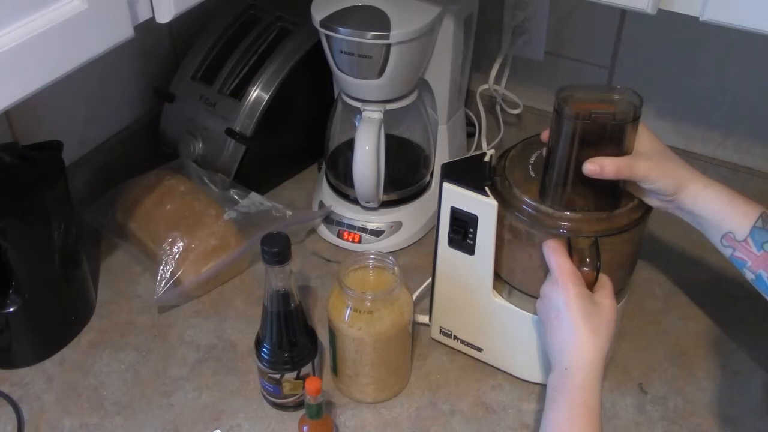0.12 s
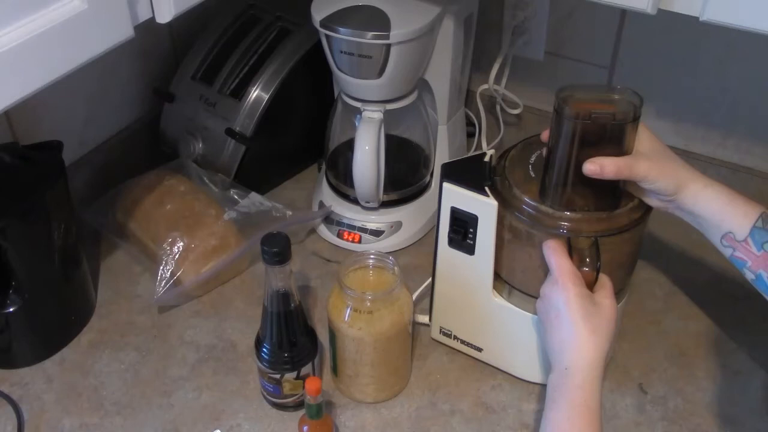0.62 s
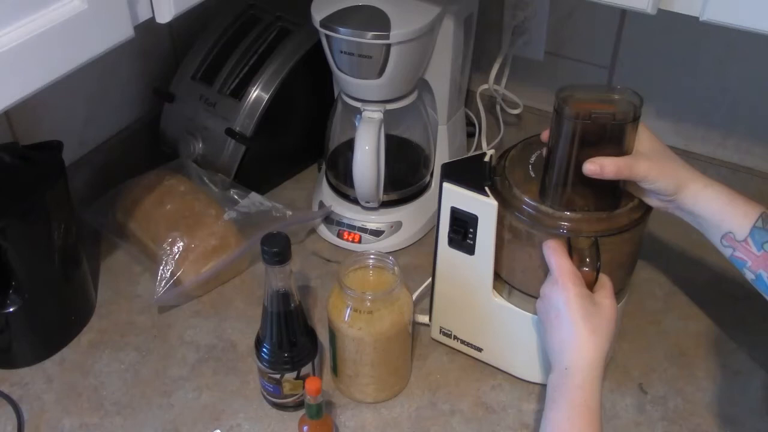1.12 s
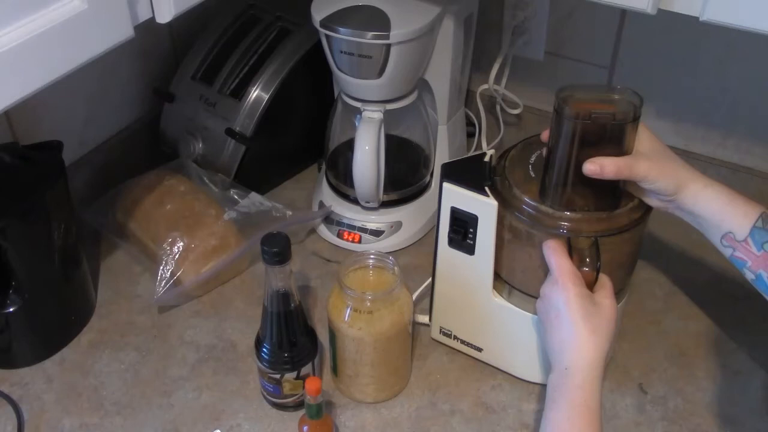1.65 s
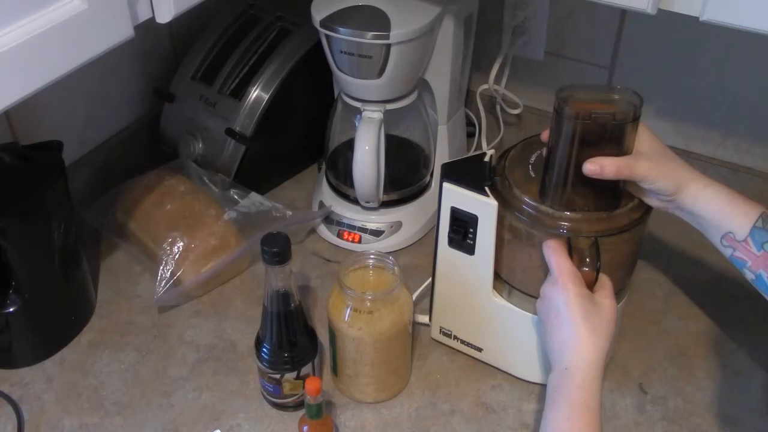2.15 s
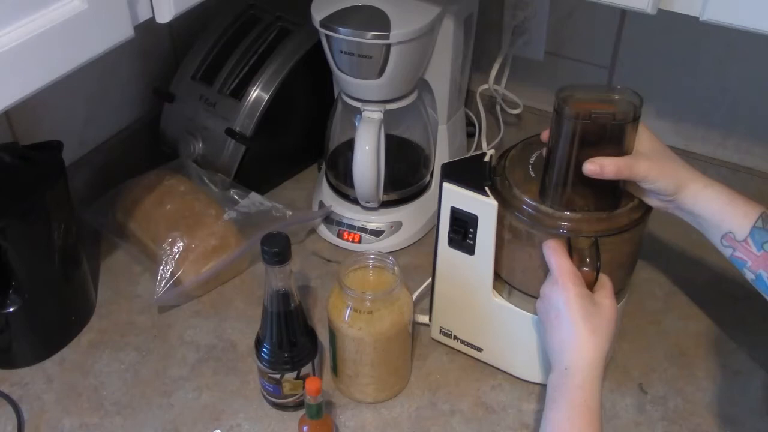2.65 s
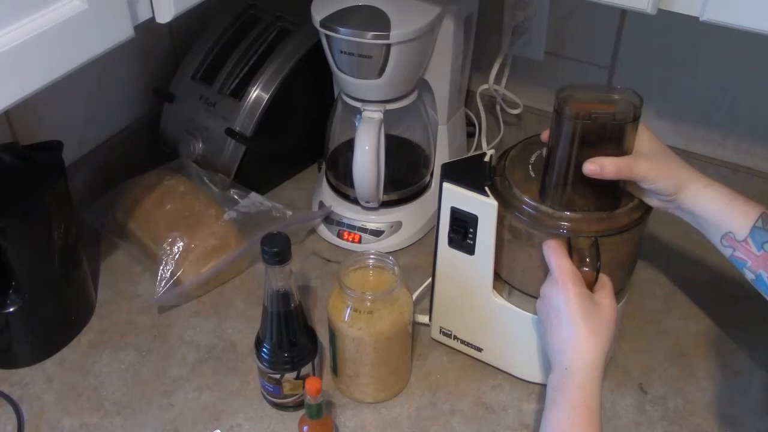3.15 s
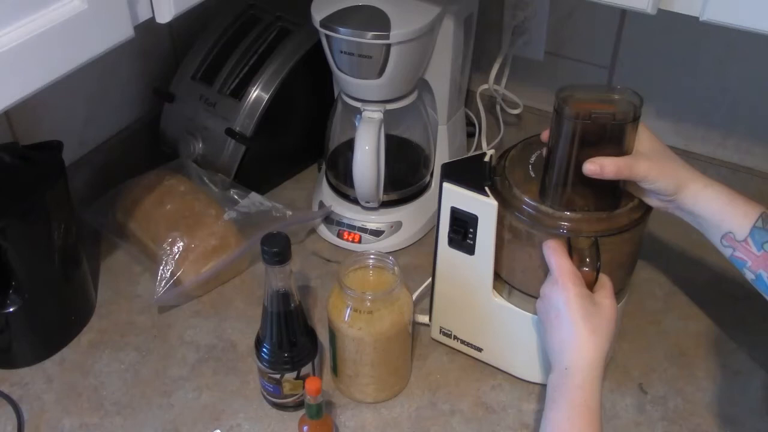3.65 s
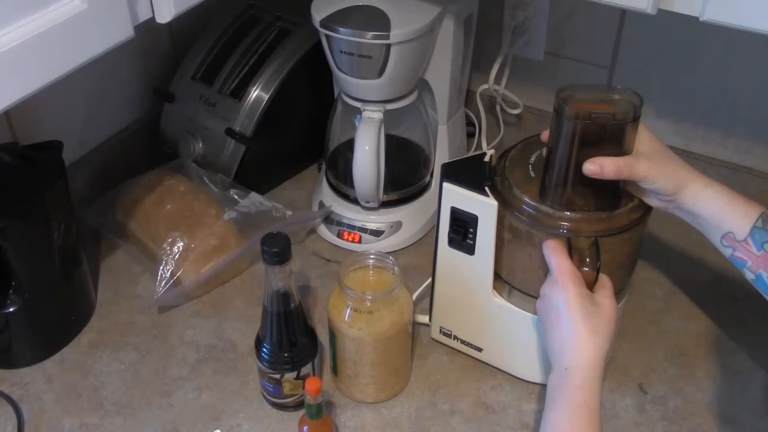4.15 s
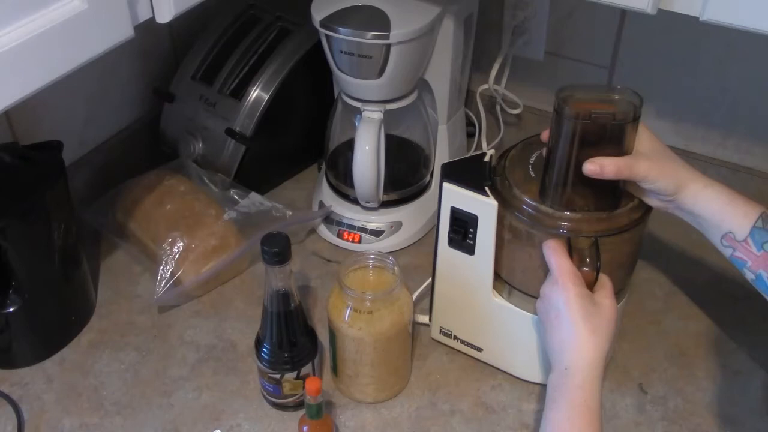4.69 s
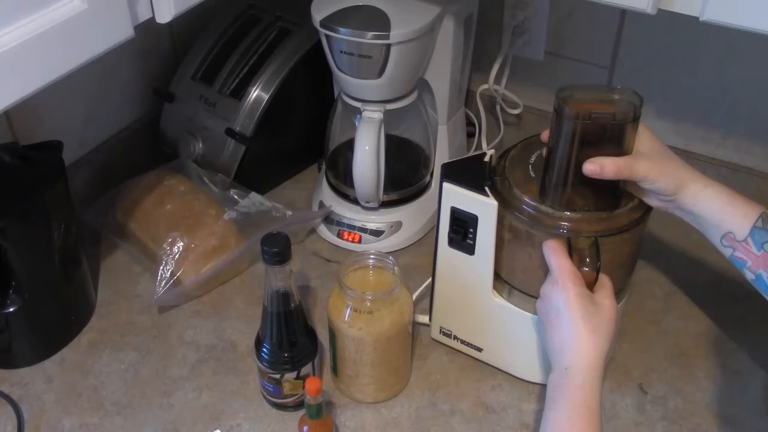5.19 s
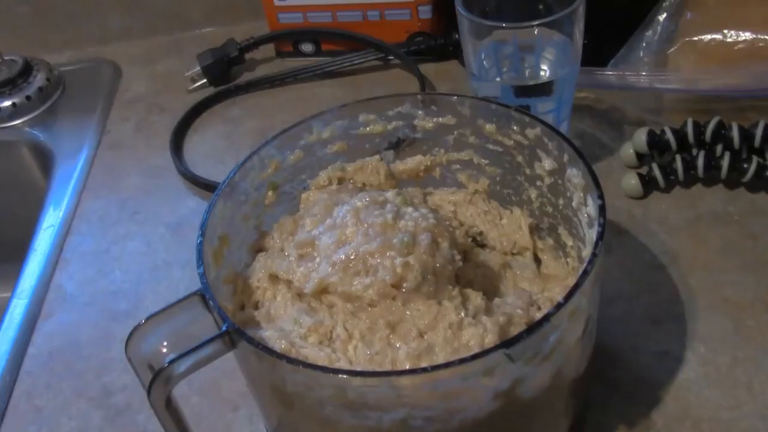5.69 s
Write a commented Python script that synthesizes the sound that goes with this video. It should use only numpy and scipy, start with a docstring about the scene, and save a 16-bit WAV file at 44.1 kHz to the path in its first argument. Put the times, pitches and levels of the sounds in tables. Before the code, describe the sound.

Quiet kitchen room tone with a faint low hum opens the scene. At 0.7 s a bowl is set down with a hard woody knock and several fast rattles until 0.83 s. A brief dip to silence at 0.88 s leads to hurried, sped-up handling: grainy lid friction and bright plastic clicks, strongest around 1.2-1.3 and 1.5 s. A switch snaps at 1.67 s and the food processor starts almost instantly, a loud, dense, gritty roar centred around 2.5-4 kHz, with thin whines and slight flutter, little bass. At 4.0-4.14 s plastic clacks, a bright ringing metal clank and a tiny rising squeak interrupt; the motor drops about 8 dB and creeps back over a second. At 5.5 s a click ends it, with a short reverberant ring-out. After another dip at 5.68 s, quiet room tone fades in with a very faint knock and squeak. Close, dry, identical channels.

```python
"""A food processor on a kitchen counter: dense noise rings through housing and bowl, with thin motor whines.
Before it, the bowl is set down with knocks in a quiet room; a fade leads into a stretch heard four times fast.
There the lid is twisted shut (friction noise, ringing plastic modes), the switch snaps and the motor grinds.
Metal clanks beside it, the level ducks and creeps back; it stops, rings out, and the quiet room fades in."""
import sys
import numpy as np
from scipy import signal
from scipy.fft import rfft, irfft
from scipy.io import wavfile
from scipy.ndimage import uniform_filter1d, minimum_filter1d

SR = 44100
rng = np.random.default_rng(int(sys.argv[2]) if len(sys.argv) > 2 else 0)


def volts_from_db(level):
    """Convert decibel levels to linear amplitude ratios."""
    exponent = np.asarray(level, float) / 20
    return 10 ** exponent


def master_out(mix):
    """Clip the mix to full scale and print it as 16-bit PCM to the path in sys.argv[1]."""
    frames = np.transpose(np.atleast_2d(mix))
    ceiling = np.clip(frames, -1, 1)
    pcm = np.round(ceiling * 32767).astype(np.int16)
    wavfile.write(sys.argv[1], SR, pcm)


N = 256132
T = np.arange(N) / SR
HZ = np.maximum(np.arange(N // 2 + 1) * SR / N, 1)
START_S, STOP_S = 1.6684, 5.497   # motor on, off


def rms_one(x):
    """Scale to unit rms."""
    return x / np.sqrt(np.mean(x ** 2) + 1e-20)


def in_time(rows):
    """Columns of a table joined by straight lines over time."""
    s, *columns = np.transpose(rows)
    return [np.interp(T, s, column) for column in columns]


def at_hz(points, hz):
    """A spectrum in dB read on a log frequency axis."""
    points_hz, values = np.array(points).T
    return np.interp(np.log(hz), np.log(points_hz), values)


def resonances(peaks):
    """Power of noise-driven resonances with steep skirts, at every frequency."""
    power = 0
    for hz, width_hz, db in peaks:
        offset = 2 * (HZ - hz) / width_hz
        power = power + volts_from_db(2 * db) / (1 + 0.495 * offset ** 2) ** 2
    return power


def coloured(gain):
    """Unit-rms noise with the given gain shape over frequency."""
    return rms_one(irfft(rfft(rng.standard_normal(N)) * gain, N))


def drift(rate_hz):
    """Random wander of unit rms: two-pole low-passed noise, computed every 40 samples."""
    r = np.exp(-80 * np.pi * rate_hz / SR)
    slow = signal.lfilter([1], [1, -2 * r, r * r], rng.standard_normal(N // 40 + 2002))
    slow = rms_one(slow[2000:])   # settled part
    return np.interp(np.arange(N) / 40, np.arange(len(slow)), slow)


def strike(start_s, level_db, modes, rise_ms, spread_db, detune, crack_db, crack_s):
    """A blow: modes of random strength and pitch die away over a short noise crack; level_db maps Hz to dB."""
    t = np.arange(SR // 4) / SR
    luck = rng.standard_normal((len(modes), 2))
    blow = 0
    for (hz, db, t60_s), (strength, pitch) in zip(modes, luck):
        decay = volts_from_db(-60 * t / t60_s)
        tone = np.sin(2 * np.pi * hz * (1 + detune * pitch) * t)
        blow = blow + volts_from_db(db + level_db(hz) + spread_db * strength) * decay * tone
    hz = np.maximum(np.arange(len(t) // 2 + 1) * SR / len(t), 1)
    crack = irfft(rfft(rng.standard_normal(len(t))) * volts_from_db(level_db(hz)), len(t))
    blow = blow + volts_from_db(crack_db) * crack * np.exp(-t / crack_s)
    blow = blow * np.minimum(1000 * t / max(rise_ms, .05), 1)
    out, at = np.zeros(N), round(start_s * SR)
    out[at:at + len(t)] = blow[:N - at]
    return out


def room(x, t60_s, wet_db, dull_hz):
    """Direct sound plus a tail of dying noise, low-passed at dull_hz."""
    t = np.arange(round(SR * .6)) / SR
    low_pass = signal.butter(1, dull_hz, fs=SR, output="sos")
    tail = signal.sosfilt(low_pass, rng.standard_normal(len(t))) * volts_from_db(-60 * t / t60_s)
    tail = tail / np.sqrt(np.sum(tail ** 2))
    return x + volts_from_db(wet_db) * signal.fftconvolve(x, tail)[:N]


def hum(lines, waver_db):
    """Steady tones whose levels waver at random."""
    out = 0
    for hz, db in lines:
        out = out + np.sqrt(2) * volts_from_db(db + waver_db * drift(6)) * np.sin(2 * np.pi * hz * T)
    return out


# quiet room noise shape: f/Hz, density/dB relative
QUIET_COLOUR = [(40, -51), (170, -11), (300, -11), (520, -10.5), (800, -14), (1100, -17.5), (3000, -25.5),
                (9000, -37.5), (9900, -33), (10800, -43), (15500, -49)]
# quiet room tones: f/Hz, level/dB rms
QUIET_TONES = [(242.2, -56.5), (301.5, -53.5), (360.7, -65.5), (414.5, -59), (522.2, -62.5)]


def quiet_room():
    """Room noise of slowly wandering level, with low hum tones."""
    noise_db = -46.5 + 1.0 * drift(4.9)
    return volts_from_db(noise_db) * coloured(volts_from_db(at_hz(QUIET_COLOUR, HZ))) + hum(QUIET_TONES, waver_db=1.0)


# knocks of the bowl: t/s, level/dB, brightness/dB, rise/ms
BOWL_KNOCKS = [(0.6916, -5, -4.5, 2.96), (.712, -17.5, 2, 1.6), (.727, -18.5, -7.5, 1.53),
               (.757, -13, 9, 0.71), (.765, -17.5, -5, 1.42), (.829, -27.5, -11.5, 1.24),
               (5.775, -33.5, -8, 8.4)]
# modes of the knock: f/Hz, level/dB relative, t60/s
WOODEN_MODES = [(110, -8, .06), (430, -6, .035), (600, -8, .03), (800, -8, .03), (1000, -8, .03),
                (1180, -6, .03), (1360, -6, .03), (1790, 3, .018), (1930, 2, .016), (2440, -3, .025),
                (2650, -5, .022), (3540, -10, .018), (4200, -12, .015)]


def knocks():
    """The bowl is set down and rattles once more: wooden modes ring under a noise crack."""
    out = 0
    for s, db, bright_db, rise_ms in BOWL_KNOCKS:
        tone = [(60, -36), (250, -10.5), (2000, -6.5),
                (5000, bright_db - 18), (9000, bright_db - 38), (15000, bright_db - 50)]
        out = out + strike(s, lambda hz: db + at_hz(tone, hz), WOODEN_MODES, rise_ms,
                           spread_db=2.0, detune=0.02, crack_db=5.0, crack_s=0.0049)
    return room(out, t60_s=0.404, wet_db=-6, dull_hz=6000)


# room noise shape, four times fast: f/Hz, density/dB relative
QUICK_COLOUR = [(60, -37.5), (400, -22), (650, -20.5), (1000, -5.5), (1500, -7), (3000, -11.5), (6000, -18),
                (15700, -26)]
# room tones, four times fast: f/Hz, level/dB rms until the stop
QUICK_TONES = [(721, -60.5), (1203, -55.5)]


def quick_room():
    """Room noise and hum tones as heard four times fast; 3 dB lower after the stop."""
    noise = volts_from_db(-45) * coloured(volts_from_db(at_hz(QUICK_COLOUR, HZ)))
    return (noise + hum(QUICK_TONES, waver_db=2.5)) * volts_from_db(-3 * (T > STOP_S))


# lid strokes along the rim: peak t/s, level/dB, rim ring level/dB relative, 20 dB swell/s, 20 dB sink/s
LID_STROKES = [(.95, -46, -14.5, 3.25, 0.25), (1.15, -40, 5.5, 0.18, 0.23),
               (1.235, -38.5, -5.5, 0.24, 0.24), (1.35, -42.5, -1.5, 0.02, 0.17)]
# friction noise shape: f/Hz, density/dB relative
RUB_COLOUR = [(400, -20.5), (900, -12), (1500, -2.5), (4000, -8), (9000, -6.5), (15700, -17.5)]
# rim resonances: f/Hz, width/Hz, level/dB relative
RIM_PEAKS = [(4060, 300, 2.5), (8000, 400, -3.5), (13370, 740, 1.5), (14380, 1200, -4.5)]


def slide():
    """Grainy friction noise under each lid stroke, with noise at the rim's resonances."""
    ring_steepness = 1.6   # the ring swells and sinks faster than the rub
    rub_rows, rim_rows = [], []
    for s, db, ring_db, swell_s, sink_s in LID_STROKES:
        under_db = -20 * np.maximum((s - T) / swell_s, (T - s) / sink_s)
        rub_rows.append(db + under_db)
        rim_rows.append(db + ring_db + ring_steepness * under_db)
    rub_db, rim_db = np.max(rub_rows, axis=0), np.max(rim_rows, axis=0)
    rub = coloured(volts_from_db(at_hz(RUB_COLOUR, HZ))) * volts_from_db(rub_db + 2.3 * drift(40))
    rim = coloured(np.sqrt(resonances(RIM_PEAKS))) * volts_from_db(rim_db + 2.0 * drift(25))
    return (rub + rim) * (T < START_S)


# lid, switch and bowl contacts: t/s, level/dB at 3.5 kHz, tilt/(dB/oct), bend/(dB/oct^2)
PLASTIC_CONTACTS = [(.91, -40.5, -0.16, 3), (.938, -42, -8, -0.37), (.948, -38.5, -5, 0.22),
                    (1.026, -32.5, -3.5, 0.56), (1.173, -38, -5.5, -3), (1.206, -21.5, 5, 5),
                    (1.233, -32.5, 5.5, 10), (1.241, -27.5, -0.5, 8), (1.245, -22, -5, 3.5),
                    (1.269, -15, -3, 3.5), (1.29, -40, -4, 0.9), (1.349, -37, -5, -0.18),
                    (1.399, -39, -8, -0.07), (1.436, -35, 0.88, 6.5), (1.502, -18.5, 4.5, 4),
                    (1.533, -30.5, 4, 4.5), (1.653, -40, 5, 3.5), (1.666, -16.5, 4, 1.94),
                    (3.981, -12, 0.2, 3.5), (4.002, -13.5, 1.5, 5.5), (4.104, -15.5, 4.5, 2.5),
                    (4.112, -12, 2, 3.5), (4.138, -14, 10, 8), (5.492, -15, 3.5, 5.5),
                    (5.645, -58.5, -25, 0.93)]
# modes of the plastic parts: f/Hz, level/dB relative, t60/s
PLASTIC_MODES = [(980, 0, .02), (1250, -2, .018), (1560, 0, .02), (2120, 0, .018), (2760, -3, .016),
                 (2970, 0, .026), (3500, -3, .012), (4710, -5, .012), (5440, -2, .012), (6350, 3.5, .02),
                 (7400, -3, .01), (10300, -2, .008), (13000, -3, .007), (15000, -2, .008)]


def contacts():
    """Plastic parts click; each contact tilts and bends the balance of modes and crack."""
    out = 0
    for s, db, tilt, bend in PLASTIC_CONTACTS:
        def tone_db(hz):
            octaves = np.clip(np.log2(hz / 3500), -1, 2.1)
            low_cut_db = 32.3 * np.minimum(np.log2(hz / 800), 0)
            return db + tilt * octaves - bend * octaves ** 2 + low_cut_db
        out = out + strike(s, tone_db, PLASTIC_MODES, 1.0, spread_db=2.5, detune=.01,
                           crack_db=11.0, crack_s=0.00316)
    high_pass = signal.butter(3, 550, "high", fs=SR, output="sos")   # the clicks carry no bass
    return room(signal.sosfilt(high_pass, out), t60_s=0.121, wet_db=-6, dull_hz=7030)


# low thumps under the loudest clicks: t/s, level/dB
LOW_THUMPS = [(1.665, -41.5), (3.984, -37.5), (4.087, -41), (4.14, -48.5)]
# thump modes: f/Hz, level/dB relative, t60/s
THUMP_MODES = [(90, -2.5, 0.063), (170, -1, 0.055), (292, 0.5, .05)]


def thumps():
    """Short dull thumps ring at low modes."""
    out = 0
    for s, db in LOW_THUMPS:
        out = out + strike(s, lambda hz: db + 0 * hz, THUMP_MODES, 3.2, spread_db=2.5, detune=0.055,
                           crack_db=-37.5, crack_s=.003)
    return out


def grinding_db():
    """Motor level: catches, settles, runs; a short gap under the clank, a duck and a slow creep back."""
    run_db = -12
    catch_db, catch_s = -12, 0.0282     # start offset, time constant
    settle_db, settle_s = -4, 0.259
    gap_from_s, gap_to_s, gap_db, gap_edge_s = 4.078, 4.104, -8, 0.0049
    duck_at_s, duck_fall_s, duck_db, creep_db_per_s = 4.125, 0.05, -8.5, 8.0
    running_s = np.maximum(T - START_S, 0)
    start_db = catch_db * np.exp(-running_s / catch_s) + settle_db * np.exp(-running_s / settle_s)
    gap = np.clip(np.minimum(T - gap_from_s, gap_to_s - T) / gap_edge_s, 0, 1)
    fall = np.clip((T - duck_at_s) / duck_fall_s, 0, 1)
    creep_db = creep_db_per_s * np.maximum(T - duck_at_s - duck_fall_s, 0)
    return run_db + start_db + gap_db * gap + fall * np.minimum(duck_db + creep_db, 0)


# broad grinding noise: f/Hz, density/dB relative
GRINDING_COLOUR = [(40, -50), (300, -41.5), (550, -33), (700, -19), (1250, -22), (2350, -16), (3000, -9),
                   (3800, -10.5), (6000, -11.5), (7400, -16), (12000, -20), (15700, -27.5)]
# housing and bowl resonances: f/Hz, width/Hz, level/dB relative
HOUSING_PEAKS = [(735.7, 66, -13), (877.4, 71, -15.5), (971.1, 77.4, -2.5), (1089.5, 83, -13),
                 (1135, 71, -10.5), (1409.5, 154, -8.5), (1583.5, 65.2, -3), (1816.5, 67, -1.5),
                 (1933, 68, -5), (2136.5, 133, -3), (2277, 48, -10.5), (2483, 56, -3.5), (2575, 40, 3),
                 (2661.3, 55, 3.5), (2782, 86, -6.5), (2885.4, 99.7, 1), (2975, 50, -2), (3120, 86, -5.5),
                 (3315, 89.5, -4.5), (3494, 63, -7.5), (3597.5, 74, -6), (3886, 46, -10), (4398, 107, -8),
                 (4704, 26, -4), (5448, 123, -8), (5769, 70, -6.5)]
# motor tones: f/Hz, level/dB re grinding noise, waver/dB
MOTOR_TONES = [(479.5, -33, 2), (1070, -27.5, 3), (2400.5, -25.5, 3), (7202.5, -24, 2)]
# changing paste: t/s, level/dB re running level, 2.4-3 kHz bowl band/dB, treble/dB at 12 kHz
PASTE_LOAD = [(1.7, 0.27, -4.5, 4), (1.87, -1.2, -5.5, 4), (2.03, 0.56, -2.5, 3.5), (2.25, 0.58, -3, 3.5),
              (2.45, -1.05, -3, 3), (2.6, .3, 0.5, 2), (3.3, 0.25, 2, 1.5), (3.7, 0.05, -0.21, 1.87),
              (3.9, -0.5, 0.07, 2), (4.07, -2.5, 2.5, 3), (4.12, -1.19, 1.64, 7), (4.25, -0.16, 1.5, 2.5),
              (4.4, 0.18, 1.52, 2.5), (5.03, 0.71, 0.5, 0.4), (5.15, -1.5, 0.86, 1.5),
              (5.5, 1.1, 0.38, 0.5)]
# decay after the stop: f/Hz, t60/s
RING_OUT_T60 = [(300, .16), (1000, 0.178), (3000, 0.18), (8000, 0.179), (15000, 0.12)]


def motor():
    """Blade and paste shake the housing with noise; third-octave bands flicker, shift with load, ring out."""
    paste_db, bowl_db, treble_db = in_time(PASTE_LOAD)
    body = volts_from_db(2 * at_hz(GRINDING_COLOUR, HZ)) + resonances(HOUSING_PEAKS)
    noise = rfft(coloured(np.sqrt(body)))
    surge = drift(5.4)   # shared by all bands
    third_octaves = 3 * np.log2(HZ)
    since_stop_s = np.maximum(T - STOP_S, 0)
    out = 0
    for k in range(15, 43):
        hz = 2 ** (k / 3)
        band = irfft(noise * np.clip(1 - np.abs(third_octaves - k), 0, 1), N)
        if hz < 2400:
            load_db = .5 - 0.23 * bowl_db   # the low bands move against the bowl band
        elif hz < 3000:
            load_db = bowl_db
        else:
            load_db = treble_db * np.log2(hz / 3000) / 2
        flicker_db = 0.39 * surge + 1.444 * drift(19.36)
        out = out + band * volts_from_db(load_db + flicker_db - 60 * since_stop_s / at_hz(RING_OUT_T60, hz))
    for hz, db, waver_db in MOTOR_TONES:
        tone_db = db + waver_db * drift(2.5) - 60 * since_stop_s / 0.1
        out = out + np.sqrt(2) * volts_from_db(tone_db) * np.sin(2 * np.pi * hz * T)
    # the direct sound goes first: 7.5 dB in 17 ms, while the room rings on
    first_drop_db = -7.5 * np.minimum(since_stop_s / 0.017, 1)
    onset = np.clip((T - START_S) / 0.0035, 0, 1)
    return out * volts_from_db(grinding_db() + paste_db + first_drop_db) * onset


# utensil blows: t/s, level/dB
METAL_BLOWS = [(4.079, -8), (4.086, -13), (4.098, -20), (4.128, -24)]
# utensil modes: f/Hz, level/dB relative, t60/s
METAL_MODES = [(4960, -2, .06), (5810, -10, .25), (10420, -4, .07), (11600, -10, .05), (14925, 2, .065)]


def clank():
    """A metal utensil strikes and bounces, ringing its high modes."""
    out = 0
    for s, db in METAL_BLOWS:
        out = out + strike(s, lambda hz: db + 0 * hz, METAL_MODES, .3, spread_db=1.0, detune=0.001,
                           crack_db=-9.0, crack_s=0.0038)
    return room(out, t60_s=0.14, wet_db=-4.5, dull_hz=9000)


# brief rubbed tones: t/s, length/s, from f/Hz, to f/Hz, level/dB, roughness/0-1
RUBBED_TONES = [(4.11, 0.051, 1470, 1600, -14, 0.2), (5.77, .07, 2620, 2750, -55, .9)]


def squeaks():
    """Short gliding tones with a soft swell; roughness is a fast random tremble."""
    out = 0
    for s, length_s, from_hz, to_hz, db, rough in RUBBED_TONES:
        along = np.clip((T - s) / length_s, 0, 1)
        phase = 2 * np.pi * np.cumsum(from_hz + (to_hz - from_hz) * along) / SR
        tremble = 1 - rough + rough * drift(250)
        out = out + volts_from_db(db) * tremble * np.sin(np.pi * along) ** 2 * np.sin(phase)
    return out


# fades through silence between the three stretches: t/s, fade-out/s, fade-in/s
STRETCH_JOINS = [(.88, 0.031, 0.0252), (5.683, 0.0397, 0.0357)]


def scene():
    """Quiet room, fast stretch, quiet room, joined by fades; two identical channels."""
    first_s, last_s = STRETCH_JOINS[0][0], STRETCH_JOINS[1][0]
    quiet = quiet_room() + knocks()
    quick = quick_room() + slide() + contacts() + thumps() + motor() + clank()
    returning = quiet * volts_from_db(-15 + 70 * (T - last_s))   # 15 dB down, rising 70 dB/s
    mono = np.where(T < first_s, quiet, np.where(T < last_s, quick, returning))
    mono = mono + squeaks()
    for s, out_s, in_s in STRETCH_JOINS:
        mono = mono * np.minimum(np.maximum((s - T) / out_s, (T - s) / in_s), 1) ** 1.35
    return np.array([mono, mono])


def band_limit(x):
    """A steep low-pass at the top of the band."""
    return signal.sosfilt(signal.butter(12, 16960, fs=SR, output="sos"), x)


def record(dry):
    """A fast limiter holds the highest peaks and the top is cut steeply."""
    ceiling, width = .96, round(.002 * SR)   # 2 ms smoothing
    limit_gain = np.minimum(ceiling / (np.abs(dry) + 1e-9), 1)
    limit_gain = uniform_filter1d(minimum_filter1d(limit_gain, 2 * width + 1), width)
    top_cut = np.clip((15830 - HZ) / 80, 0, 1) ** 2
    mix = irfft(rfft(dry * limit_gain) * top_cut, N)
    return band_limit(mix)


dry = scene()
out = record(dry)
master_out(out)
```